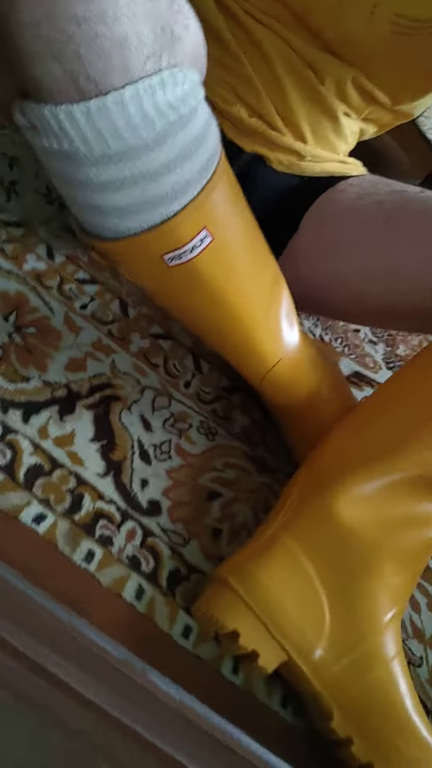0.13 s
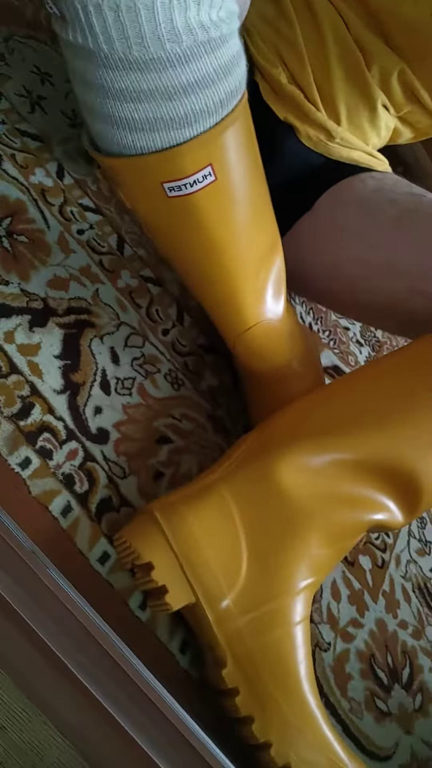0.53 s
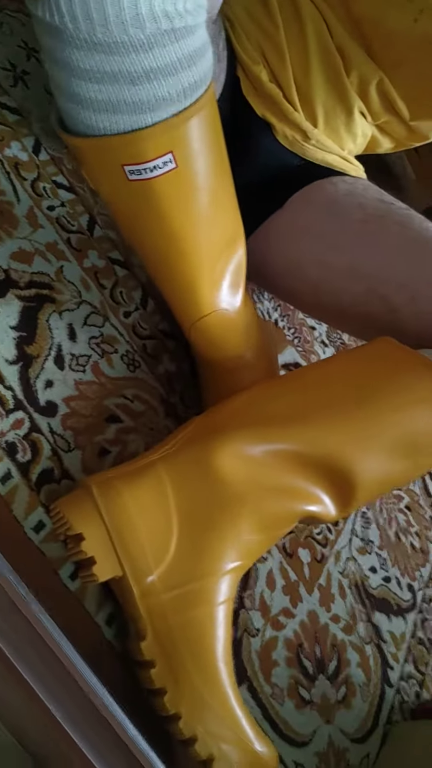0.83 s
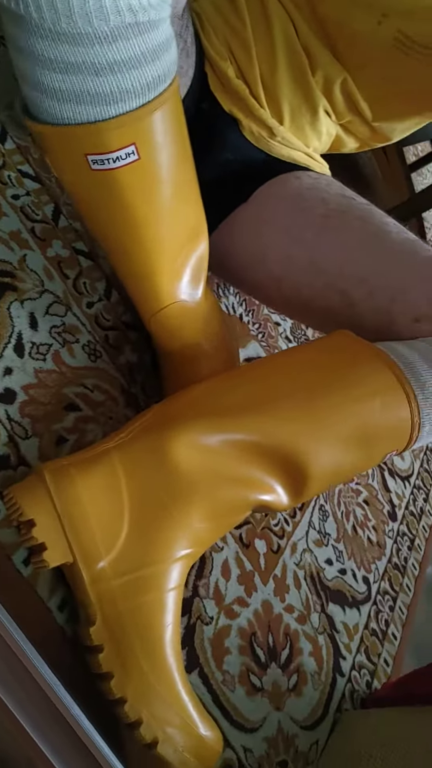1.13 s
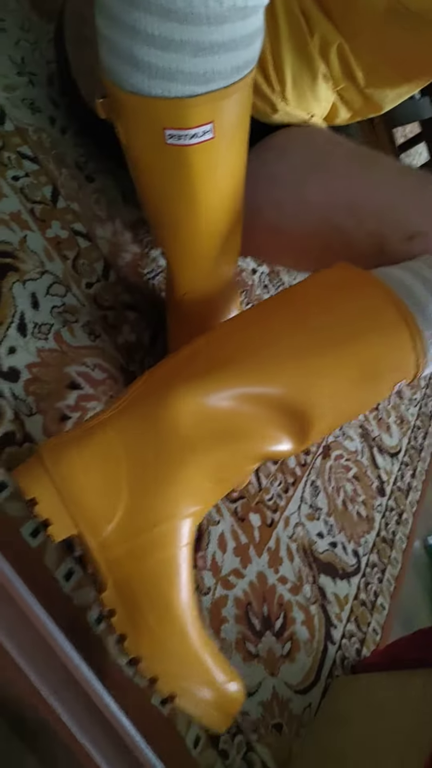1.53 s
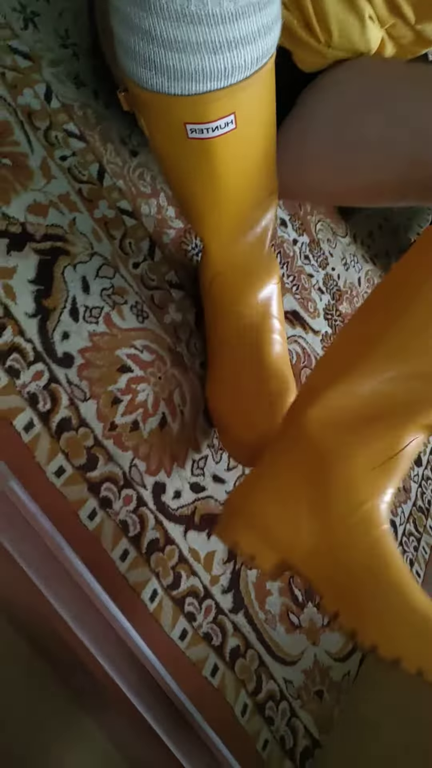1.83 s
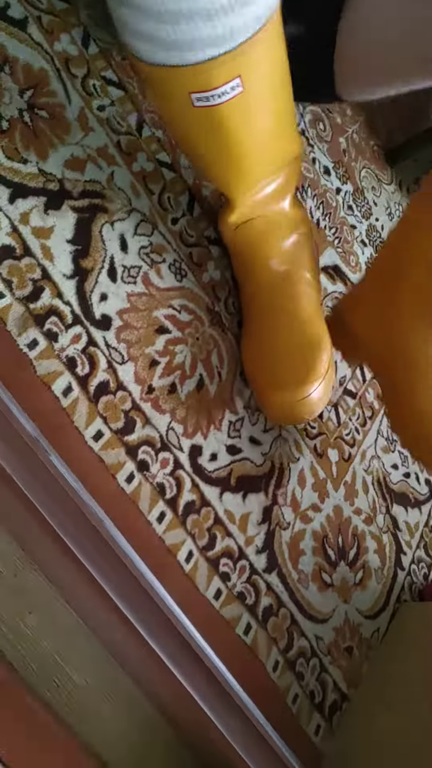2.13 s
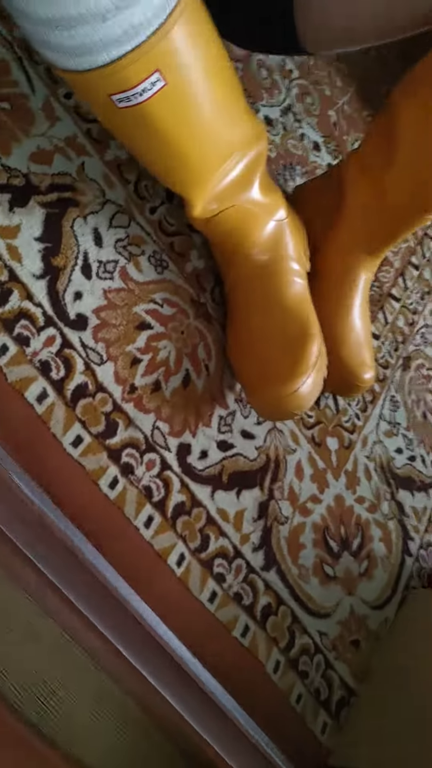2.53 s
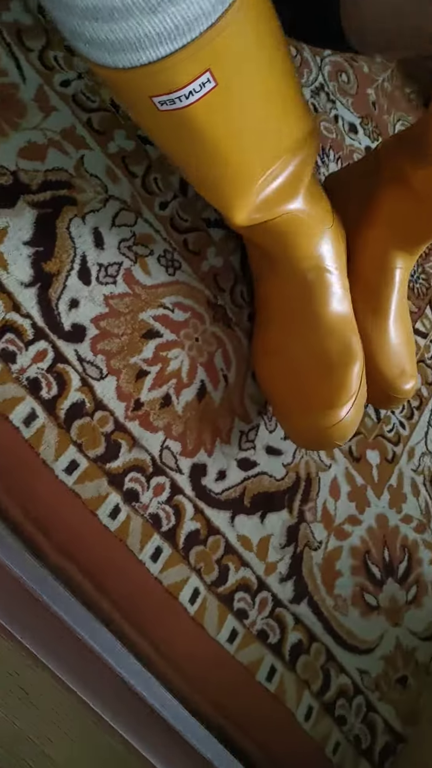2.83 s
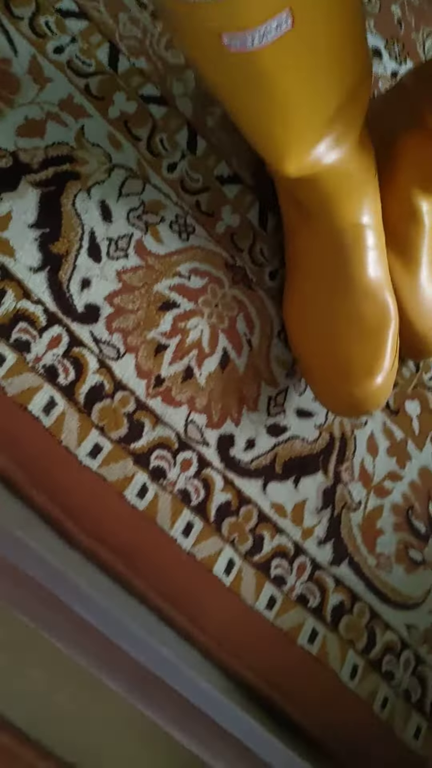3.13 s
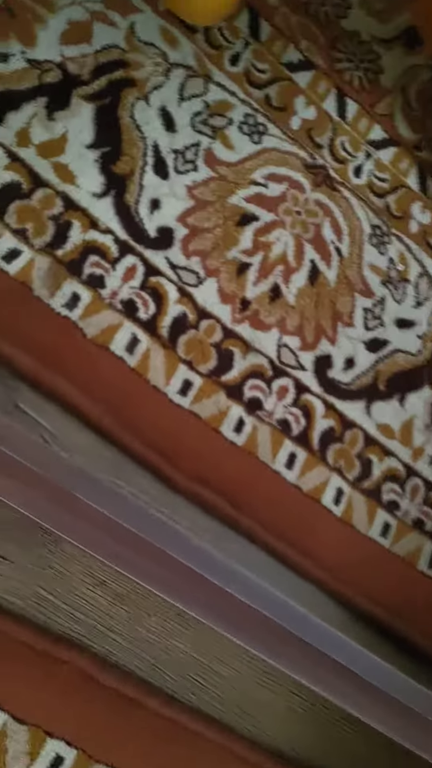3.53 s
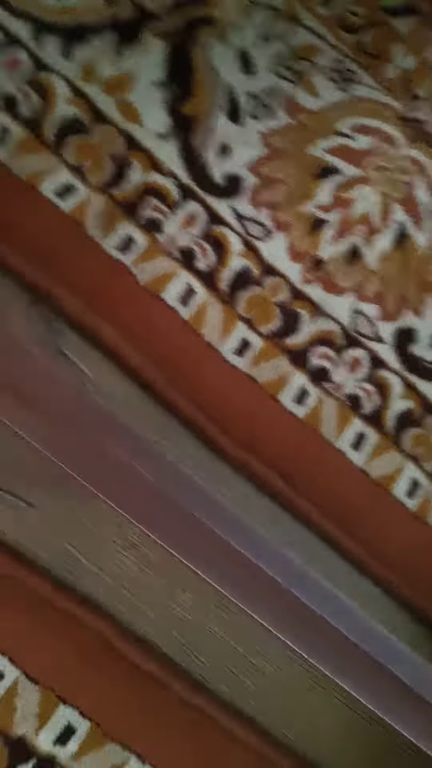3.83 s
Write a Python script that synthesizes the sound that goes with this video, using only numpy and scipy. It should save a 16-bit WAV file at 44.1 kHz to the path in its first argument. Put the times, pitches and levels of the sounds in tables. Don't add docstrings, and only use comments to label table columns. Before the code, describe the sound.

Rubber boots tap, rustle and step heavily on carpeted boards in a quiet room

```python
import sys
import numpy as np
from scipy import signal
from scipy.fft import rfft, irfft
from scipy.io import wavfile
from scipy.ndimage import uniform_filter1d

SR = 44100
rng = np.random.default_rng(int(sys.argv[2]) if len(sys.argv) > 2 else 0)


def volts(x):
    e = np.asarray(x, float) / 20
    return 10 ** e


def put_to_file(sound):
    columns = np.atleast_2d(sound).T
    safe = np.clip(columns, -1, 1)
    whole_steps = np.round(safe * 32767)
    wavfile.write(sys.argv[1], SR, whole_steps.astype(np.int16))


N = 176400


def level(x, rms_db):
    return x * volts(rms_db) / np.sqrt(np.mean(x ** 2))


def colour(x, points, turn=1):
    p = np.array(points)
    f = np.maximum(np.fft.rfftfreq(N, 1 / SR), 1)
    db = np.interp(np.log(f), np.log(p[:, 0]), p[:, 1])
    db = db - 24 * np.maximum(np.log2(p[0, 0] / f), 0)
    return irfft(rfft(x) * volts(db) * turn, N)


def band(x, hz, width_hz):
    return signal.lfilter(*signal.iirpeak(hz, hz / width_hz, SR), x)


def walk(rate_hz):
    k = int(SR / rate_hz)
    steps = np.repeat(rng.standard_normal(N // k + 1), k)
    return 2.22 * uniform_filter1d(uniform_filter1d(steps, k), k)[:N]


def curve(table, axis):
    c = np.array(table)
    time_s = np.r_[c[0, 0] - 0.4, c[:, 0]]
    value = np.r_[c[0, axis] - 15 * (axis == 1), c[:, axis]]
    return np.interp(np.arange(N) / SR, time_s, value)


def add(out, start_s, x):
    i = int(start_s * SR)
    out[i:i + len(x)] += x[:N - i]


def room_air():
    # hz, density_db (per Hz)
    room = [(15, -57), (25, -4), (94, -6), (380, -20.5), (512, -25.5), (555, -24), (7180, -45), (8680, -58),
            (15700, -35.5)]
    air = level(colour(rng.standard_normal(N), room), -62)
    return air + volts(-17) * band(air, 150, 210) * walk(31.16)


def fibres(rate_hz, spread_db):
    chance, sign, size = rng.random((3, N))
    clicks = (chance < rate_hz / SR) * np.sign(sign - 0.5) * volts(-spread_db * np.log(size + 0.029))
    return level(clicks, -9.5) + 0.68 * rng.standard_normal(N)


def friction(points, flicker_db, rate_hz, spread_db):
    x = fibres(rate_hz, spread_db)
    out = np.zeros(N)
    for k, (hz, width_hz, db) in enumerate(points):
        patch = np.roll(x, 9973 * k)
        for _ in range(2):
            patch = band(patch, hz, width_hz * 1.3)
        out += volts(db + np.roll(flicker_db[k % 2], 30011 * k)) * patch
    return level(out, 0)


def rustle():
    # start_s, effort_db, crispness_db
    cloth_moves = [(1.57, -72, -13), (1.6, -67.5, -12), (1.74, -69, -10), (1.8, -83.5, -15),
                   (1.99, -63.5, -14), (2.3, -64, -13), (2.36, -70, -10), (2.43, -61, -14),
                   (2.56, -66.5, -9), (2.76, -67, -11), (3.05, -72, -6.5), (3.12, -58, -13),
                   (3.27, -69, -11), (3.41, -62, -7), (3.64, -63, -7), (3.76, -57, -8.5), (3.86, -62.5, -9),
                   (4, -54, -11)]
    # start_s, pressure_db
    sole_drags = [(1.56, -71.5), (1.6, -66.5), (1.74, -70), (1.82, -86), (1.97, -72), (2.06, -65),
                  (2.26, -59.5), (2.34, -68.5), (2.44, -65), (2.56, -69), (2.81, -71), (2.86, -66.5),
                  (2.96, -59.5), (3.0, -71.5), (3.12, -74.5), (3.28, -70.5), (3.66, -71.5), (3.8, -64.5)]
    # hz, width_hz, level_db
    cloth_colour = [(2450, 1240, 0), (3610, 840, -3.5), (4400, 1150, 2), (5720, 860, -1), (6760, 960, 3.5),
                    (7660, 1300, 2.5)]
    crisp_colour = [(9400, 1100, 0.5), (10400, 1300, 5.5), (11700, 1500, -4), (12900, 1400, 4.5),
                    (15400, 1800, -4)]
    sole_colour = [(350, 280, -2.5), (740, 380, -2.5), (1177, 320, -2), (1660, 470, -1), (2070, 600, -3.5),
                   (2700, 480, -12)]
    # hz, gain_db
    case = [(20, -0.5), (3150, -1), (4000, 0), (8400, -1.5), (8900, -4.5), (9800, 0.5), (13450, 0),
            (13650, 3)]
    flicker_db = [[0.38 * walk(9) + 0.9 * walk(18) + 1.2 * walk(50) for _ in range(2)] for _ in range(3)]
    effort_db = curve(cloth_moves, axis=1)
    crispness_db = curve(cloth_moves, axis=2)
    pressure_db = curve(sole_drags, axis=1)
    out = []
    for port_db in (0, -5.5):
        cloth = friction(cloth_colour, flicker_db[0], 2500, 4.94) * volts(effort_db + 0.5)
        crisp = friction(crisp_colour, flicker_db[1], 1900, 6.2) * volts(effort_db + crispness_db)
        sole = friction(sole_colour, flicker_db[2], 900, 2.5) * volts(pressure_db + 4.5)
        out.append(volts(port_db) * colour(cloth + crisp + sole, case) + room_air())
    return out


def thuds():
    # start_s, peak_db, pitch_hz, crest_cycles
    taps = [(0.231, -40, 139, 0.21), (0.366, -47, 258, 0.38), (.486, -50, 254, 0.38),
            (1.073, -45.5, 308, 0.55), (1.134, -45, 340, 1.18), (1.529, -39, 173, 0.3),
            (1.651, -37.5, 326, 0.35), (1.68, -42.5, 295, 0.41), (1.701, -42, 240, 0.58),
            (1.725, -47.5, 114, 0.27), (1.875, -42, 113, 0.37), (2.95, -51, 427, 3), (1.615, -48, 79, 1.2),
            (0.155, -58, 237, 0.45), (.378, -50.5, 330, .5), (1.1006, -44.5, 190, 0.27),
            (1.672, -57, 396, 0.45), (1.711, -44, 383, 0.42), (1.72, -46, 231, 0.56),
            (1.735, -53.5, 62.6, 0.8), (1.783, -52, 140, 0.56), (1.896, -52.5, 100, .5),
            (1.983, -48.5, 94, 0.63), (2.04, -49, 180, 0.57), (2.053, -50, 330, .5),
            (2.112, -51.5, 151, 0.59)]
    # start_s, peak_db, pitch_hz, crest_cycles, board_ring_db
    heels = [(2.407, -28, 162, 0.84, -12.5), (2.435, -33.5, 62.4, 0.71, -6), (2.475, -34, 56.3, 0.8, -4.5),
             (2.606, -22, 170.7, 0.65, -12), (2.622, -38, 301, 1.07, -6), (2.645, -36.5, 200, 0.72, -3.5),
             (2.646, -43, 478, 0.7, -7), (2.45, -38.5, 170, 0.51, -1), (2.886, -46.5, 140, 1.07, 2.5),
             (2.888, -45.5, 390, 1.7, -1), (3.061, -22, 387, 0.95, -11), (3.0662, -25, 178, 0.6, -4),
             (3.066, -30.5, 62.7, 0.49, 2.5), (3.317, -39, 83, 0.74, -3), (3.332, -32, 393, 1.6, -6),
             (3.367, -24.5, 170, 0.7, -3), (3.367, -28, 410, 1.66, -6), (3.4, -34.5, 135, 0.92, -4.5),
             (3.556, -31.5, 63, 0.78, -8.5), (3.596, -36, 66.4, 0.48, -16.5), (3.6862, -18, 158, 0.57, -12),
             (3.711, -29.5, 487, 1.34, 5.5), (3.7, -33.5, 200, .8, -10), (3.722, -31.5, 139, 1.04, -6),
             (3.8462, -5, 146, 0.22, -19), (3.8422, -10.5, 248, 0.59, -27), (3.8555, -16, 147, 0.64, -9),
             (3.863, -20.5, 186, 0.5, -10), (3.897, -26, 118, 0.83, -16), (3.8733, -16.5, 106.4, 0.83, -18)]
    # hz, level_db, t60_s
    boards = [(57.2, 1.5, 0.44), (95.8, -1, 0.42), (137.4, -1.5, 0.31), (183.4, -5, 0.091),
              (245.4, -12, 0.63), (262.7, -3, 0.16), (354.2, -8, 0.33), (437, -5, 0.5)]
    tap_ring_db = -12
    push, drive = np.zeros(N), np.zeros(N)
    t = np.arange(SR // 5) / SR
    hits = [(*tap, tap_ring_db) for tap in taps] + [*heels]
    for start_s, peak_db, pitch_hz, crest_cycles, ring_db in hits:
        u = t * pitch_hz / crest_cycles
        swell = (u * np.exp(1 - u)) ** 2
        sag = 1 - 0.009 * np.minimum(u, 4)
        x = volts(peak_db) * swell * np.sin(2 * np.pi * pitch_hz * t * sag)
        add(push, start_s, x)
        add(drive, start_s, x * volts(ring_db + 10))
    drive = drive * (1 + 0.35 * walk(120))
    ring = np.zeros(N)
    for k, (hz, db, t60_s) in enumerate(boards):
        ring += (-1) ** k * volts(db) * band(drive, hz, np.log(1000) / np.pi / t60_s)
    return push + ring


def tail(x):
    # hz, gain_db
    dullness = [(120, -12.5), (250, -10.5), (450, -1.5), (650, -0.5), (1000, -7.5), (2200, -14.5),
                (5000, -9)]
    tail_db, t60_s, rise_s = -5.5, 0.5, 0.0075
    t = np.arange(SR // 3) / SR
    h = rng.standard_normal(len(t)) * volts(-60 * t / t60_s) * np.minimum(t / rise_s, 1)
    h = volts(tail_db) * h / np.sqrt(np.sum(h ** 2))
    return colour(signal.fftconvolve(x, h)[:N], dullness)


def squeak(t, jitter):
    hz, length_s, peak_db = 631, 0.02, -52
    phase = 2 * np.pi * hz * t + np.cumsum(jitter) / 22
    env = np.sin(np.pi * np.minimum(t / length_s, 1)) ** 0.72
    return volts(peak_db) * env * (np.sin(phase) + 1.2 * np.sin(1.9 * phase) + 0.15 * np.sin(4 * phase))


def ticks():
    # start_s, peak_db, centre_hz, rise_s, fall_t60_s
    scuffs = [(.32, -77.5, 6960, 0.022, .1), (.645, -78, 7050, 0.017, .15),
              (1.36, -71.5, 1900, 0.072, 0.47), (1.49, -61.5, 3500, .004, .04),
              (1.585, -58, 2200, 0.0078, 0.47), (1.59, -69, 3700, .01, .15),
              (1.102, -48, 605, 0.00086, 0.012), (1.1025, -56, 1480, 0.00062, 0.034),
              (1.102, -66, 4200, 0.00042, 0.0072), (1.159, -78, 6960, 0.016, .1),
              (1.6525, -66, 700, 0.00082, 0.016), (2.236, -57, 1660, .02, 0.11),
              (2.249, -51, 1110, 0.015, 0.06), (2.421, -49.5, 1200, 0.018, 0.3),
              (2.44, -51, 610, 0.031, 0.23), (2.6475, -57.5, 730, 0.0014, 0.04),
              (2.647, -55.5, 4400, 0.0015, 0.017), (3.059, -30.5, 970, 0.00063, 0.027),
              (3.066, -48, 880, 0.0093, 0.27), (3.19, -50, 2600, .001, 0.022),
              (3.191, -58, 800, 0.0012, .02), (3.224, -47, 593, 0.00079, 0.017),
              (3.308, -40, 1150, 0.023, 0.07), (3.31, -36.5, 610, 0.015, 0.085),
              (3.555, -45.5, 875, 0.012, 0.22), (3.565, -52.5, 7400, 0.0052, 0.096),
              (3.565, -55, 4830, 0.0055, .1), (3.565, -56, 11700, .006, 0.11),
              (3.314, -54.5, 4500, 0.017, 0.068), (3.710, -41.5, 820, 0.0011, 0.11),
              (3.783, -33, 960, 0.0011, 0.026), (3.786, -39, 456, 0.0031, 0.086),
              (3.795, -50, 1080, .01, 0.24), (3.8440, -24.5, 970, 0.00032, 0.032),
              (3.8672, -51, 4700, .0008, 0.01), (3.9485, -40, 600, 0.00062, 0.027)]
    snap_gain = 8.7
    out = np.zeros(N)
    t = np.arange(SR // 5) / SR
    noise = rng.standard_normal((len(scuffs) + 1, len(t)))
    for (start_s, peak_db, hz, rise_s, t60_s), n in zip(scuffs, noise):
        sharp = rise_s < 1 / 300
        n = n + snap_gain * sharp * (np.arange(len(t)) == int(rise_s * SR))
        env = np.minimum(t / rise_s, 1) * volts(-60 * np.maximum(t - rise_s, 0) / t60_s)
        burst = env * level(band(n, hz, min(0.79 * hz, 1800)), peak_db - 3.5)
        top = signal.butter(5, min(2.3 * hz, hz + 2000), fs=SR, output="sos")
        add(out, start_s, signal.sosfilt(top, burst))
    add(out, 2.832, squeak(t, noise[-1]))
    return out


def knock():
    start_s, length_s, level_db = 3.8446, 0.002, -32.5
    out = np.zeros(N)
    t = np.arange(SR // 20) / SR
    n = rng.standard_normal(len(t))
    snap = n + 1.2 * band(n, 5300, 2500) - 0.6 * band(n, 3000, 1500) + band(n, 13000, 3000)
    env = np.where(t < length_s, 1, volts(-27 - 3700 * t))
    add(out, start_s, volts(level_db) * snap * env)
    return out


def scene():
    # hz, side_over_mid_db
    ports = [(60, -25.5), (110, -14), (200, -8.5), (400, -5.5), (800, 0), (6000, 1.5), (8500, -9.5),
             (15000, 0)]
    thud_side_db, tick_side_db, knock_side_db, hit_lean = -8, -1, -19, 0.082
    mid, other = rustle()
    low, high, snap = thuds(), ticks(), knock()
    side = colour(other + tail(low + high), ports) + volts(knock_side_db) * snap
    hits = volts(thud_side_db) * low + volts(tick_side_db) * high
    side = side + colour(hits, ports, 1j + hit_lean)
    mid = mid + low + high + snap + tail(low + high)
    return np.array([mid + side, mid - side])


def band_limit(x):
    return signal.sosfilt(signal.butter(12, 16820, fs=SR, output="sos"), x)


def record(dry):
    low_hz, top_hz = 34, 15700
    x = signal.lfilter(*signal.butter(2, low_hz, "high", fs=SR), dry)
    x = signal.sosfilt(signal.ellip(11, 0.2, 70, top_hz, fs=SR, output="sos"), x)
    return band_limit(x)


dry = scene()
out = record(dry)
put_to_file(out)
```